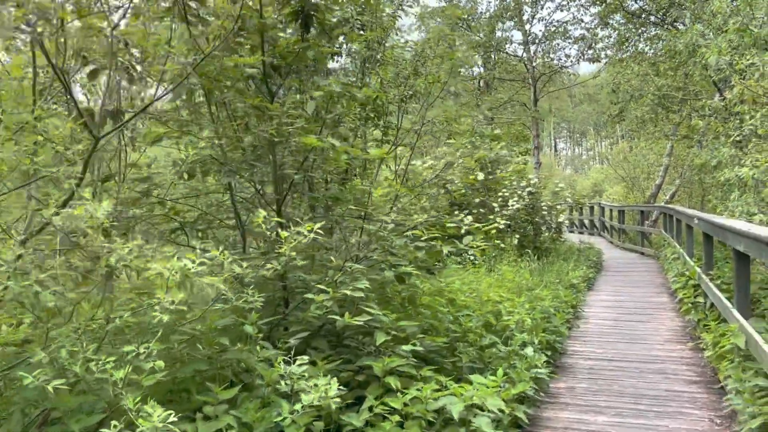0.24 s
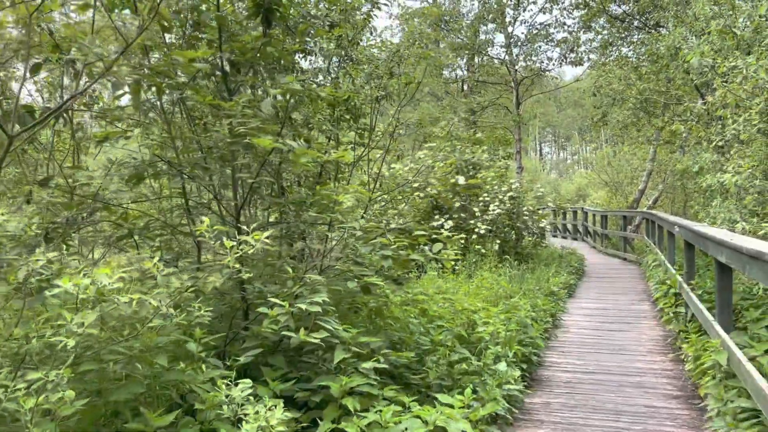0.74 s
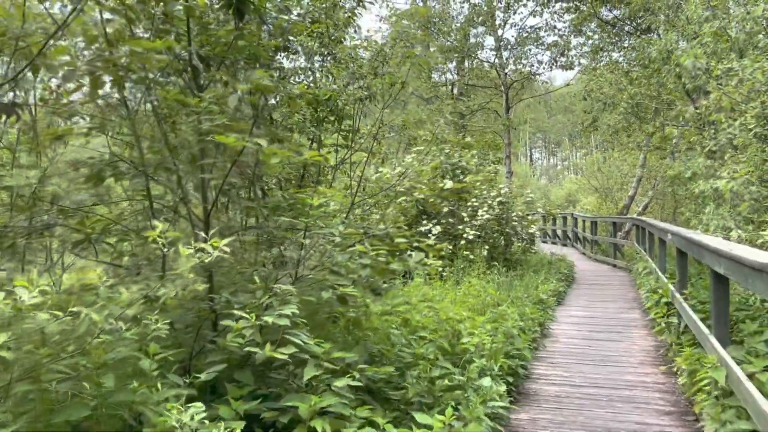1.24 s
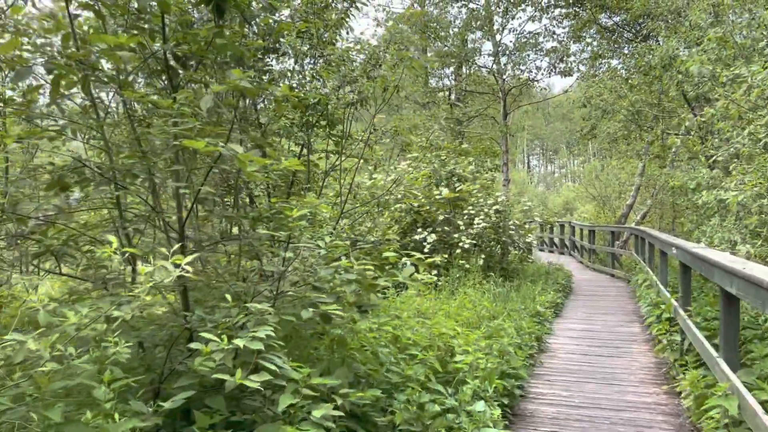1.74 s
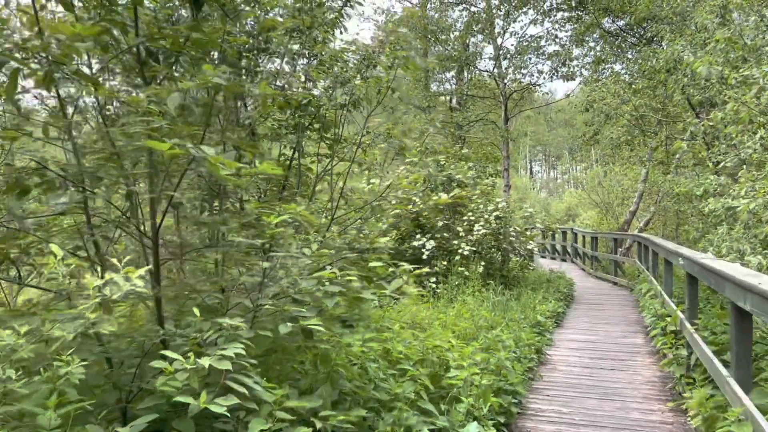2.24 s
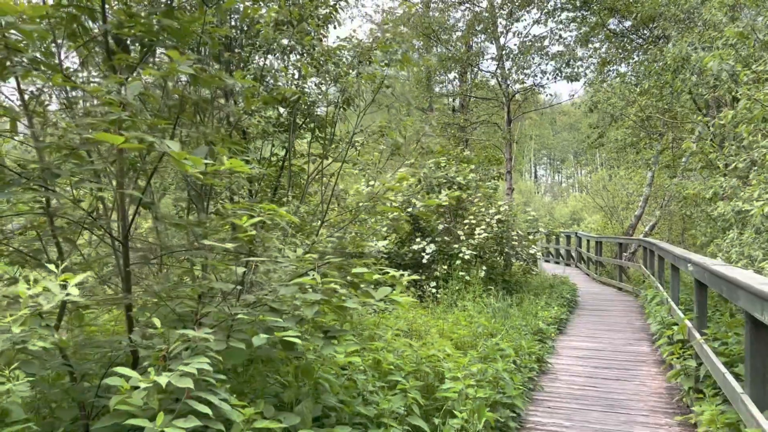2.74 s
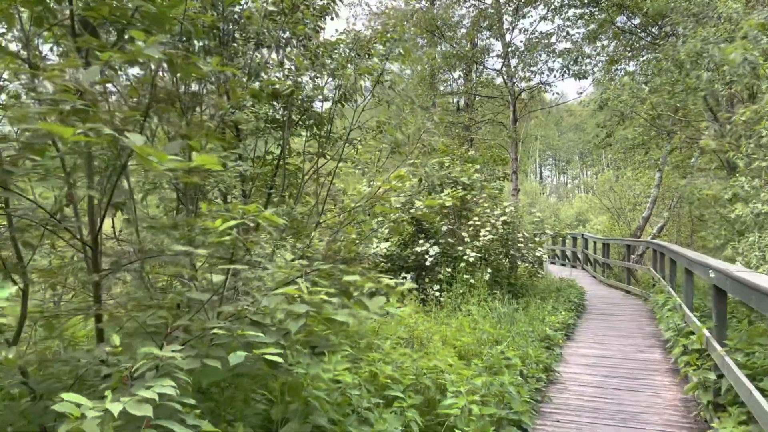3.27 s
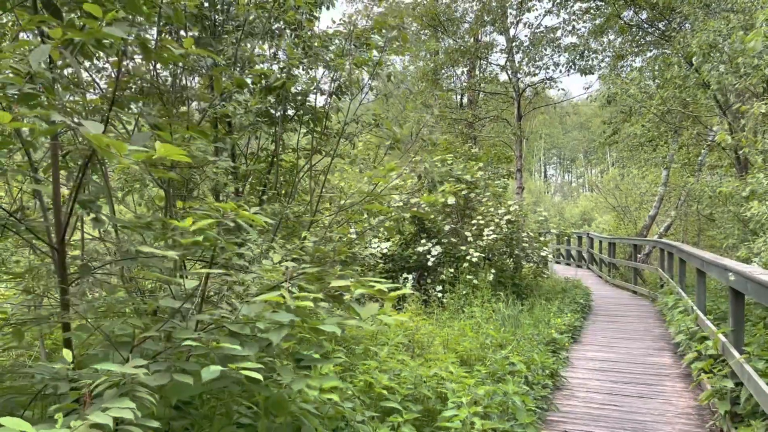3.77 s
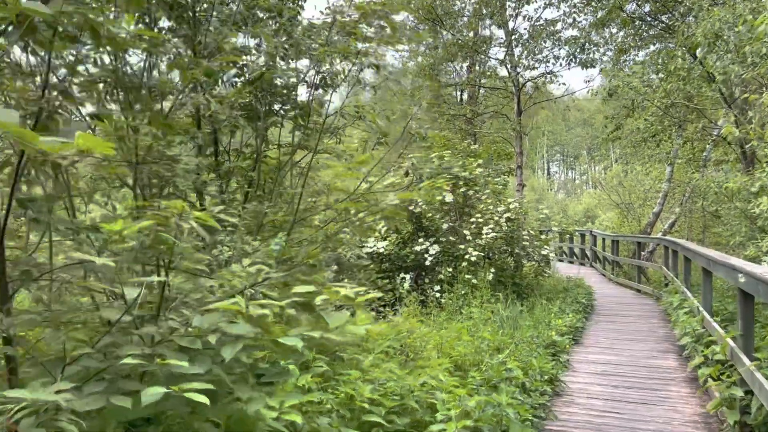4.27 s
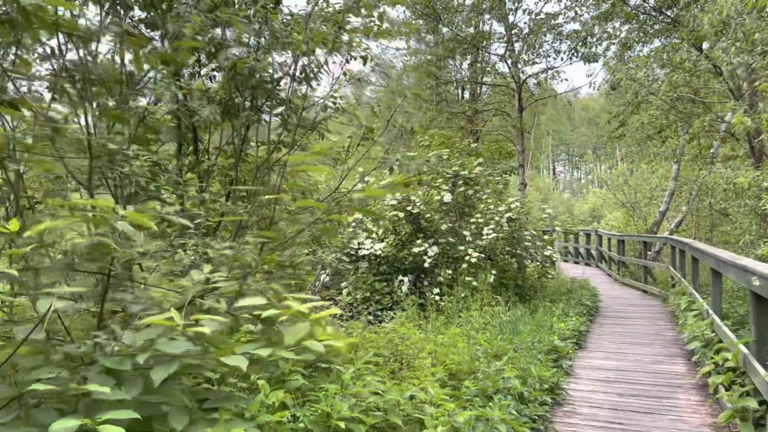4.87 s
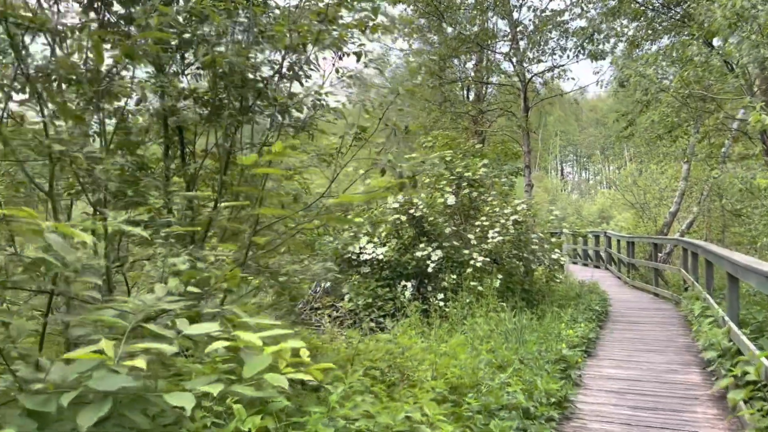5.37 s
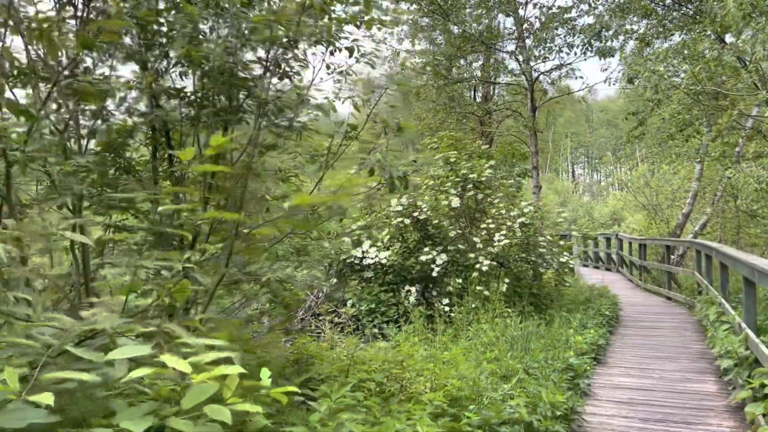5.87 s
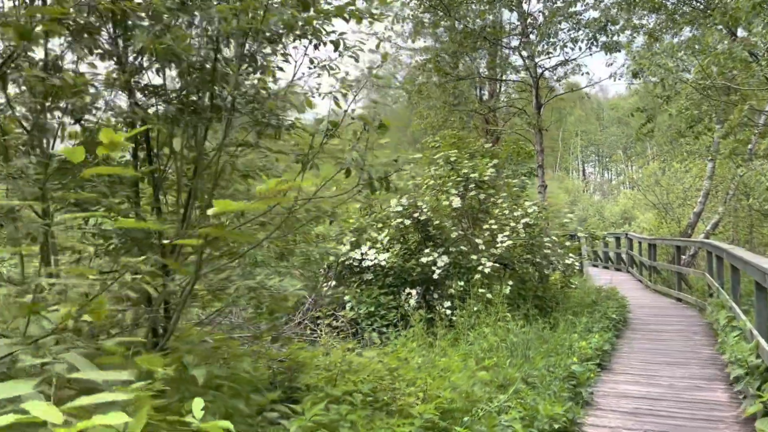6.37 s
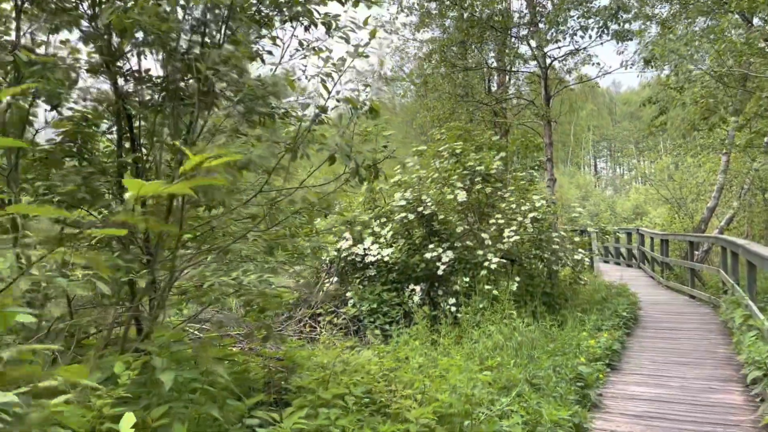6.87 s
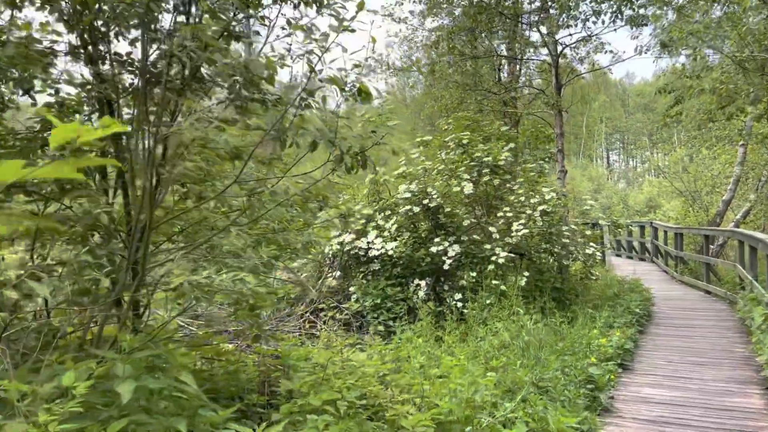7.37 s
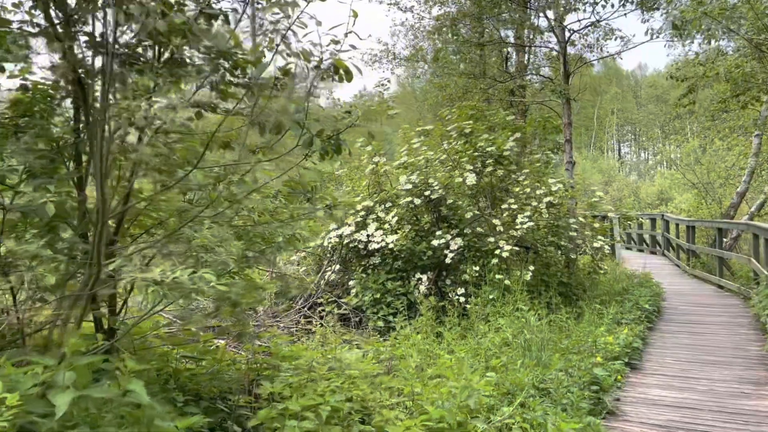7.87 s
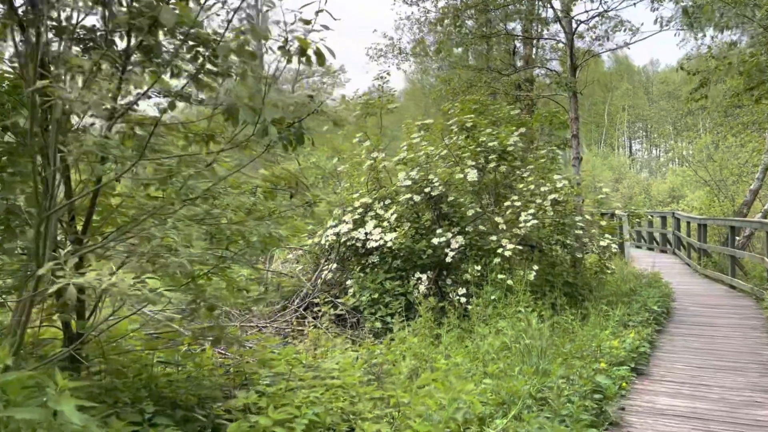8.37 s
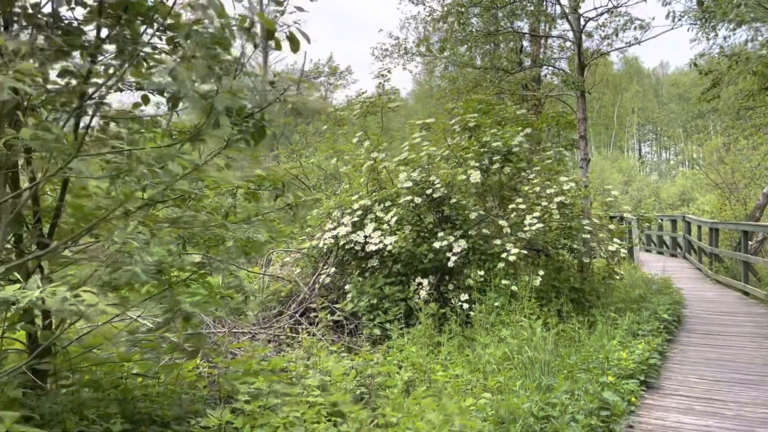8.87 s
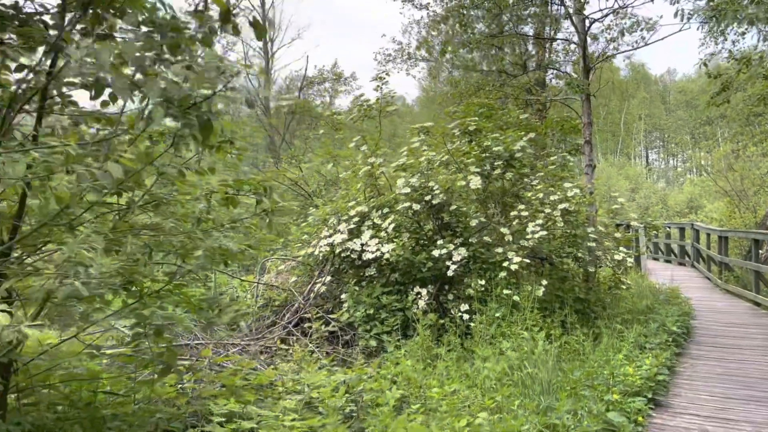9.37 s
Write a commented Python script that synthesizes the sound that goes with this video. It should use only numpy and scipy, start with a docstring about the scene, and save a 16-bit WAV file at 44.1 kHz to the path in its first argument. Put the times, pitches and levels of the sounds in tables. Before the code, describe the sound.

Several songbirds sing in a leafy wet wood, with quick gliding whistles near and a blurred chorus farther off. Song thins around the middle, then returns brighter and strongest near seven to eight and a half seconds. A low far traffic rumble swells gently beneath. Dull footfalls and hollow wooden knocks come now and then, with a loud cluster of knocks near the end. Hand-held phone stereo, outdoors.

```python
"""Whistled bird songs come first, near and far in a wet wood where trunks scatter each note into a short tail.
Each note is a gliding near-sine; random noise tails make the echoes, and a far chorus fills in behind.
Dull knocks and footfall thuds on a boardwalk are damped resonances; small ticks are short noise bursts.
Under it all lies a far traffic rumble made of noise bands. A hand-held phone colours the result."""
import sys
import numpy as np
from scipy import signal
from scipy.fft import rfft, irfft
from scipy.io import wavfile
from scipy.ndimage import uniform_filter1d

SR = 44100
rng = np.random.default_rng(int(sys.argv[2]) if len(sys.argv) > 2 else 0)


def to_wav(s):
    """Save 16-bit WAV."""
    ch = np.atleast_2d(s).T  # columns
    pcm = np.round(np.clip(ch, -1, 1) * 32767)  # PCM
    wavfile.write(sys.argv[1], SR, pcm.astype(np.int16))


N = 423801  # length in samples
FLUTTER_DB = 1.8  # moving leaves shake the direct sound of the birds


def undb(db):
    """Turn dB into a plain multiplier."""
    return 10 ** (np.asarray(db) / 20)


def lookup(x, table):
    """Read a two-column table at x, with straight lines between its rows."""
    return np.interp(x, *np.transpose(table))


def curve(seconds, values):
    """Stretch values given at some times into one value a sample."""
    return np.interp(np.arange(N) / SR, seconds, values)


def walk(rate_hz):
    """Slow random drift: random levels, held for one step and smoothed twice; spread near 1."""
    hold = int(SR / rate_hz)
    steps = np.repeat(rng.standard_normal(N // hold + 1), hold)
    return 1.39 * uniform_filter1d(uniform_filter1d(steps, hold), hold)[:N]


def add(out, s, sound):
    """Mix a sound into all channels of out, starting at s seconds."""
    i = max(int(s * SR), 0)
    out[:, i:i + sound.shape[1]] += sound[:, :N - i]


def whistle(length_s, pitch_hz, early_db, late_db, pan_db, edge_s, warble_hz=0., strokes_hz=1.):
    """A gliding near-sine with soft ends and a faint octave; a warble adds repeated falling strokes."""
    t = np.arange(int((length_s + edge_s) * SR)) / SR
    glide_hz = np.interp(t, np.linspace(0, length_s, len(pitch_hz)), pitch_hz)
    stroke = t * strokes_hz % 1  # runs from 0 to 1 in each stroke
    hz = uniform_filter1d(glide_hz, size=120) + warble_hz * (1 - 2 * stroke)
    phase = 2 * np.pi * np.cumsum(hz) / SR
    envelope = np.sin(np.pi / 2 * np.clip(np.minimum(t, t[-1] - t) / edge_s, 0, 1)) ** 2
    if warble_hz > 20:
        envelope *= np.sin(np.pi * stroke)  # each stroke swells and fades
    gain = undb(np.interp(t / length_s, [.25, .75], [early_db, late_db]))
    # the octave's strength depends on the pitch of the note
    octave_db = np.interp(hz, [3160, 4760, 5000, 5350, 7000], [-48, -28.5, -52.0, -22.5, -33.0])
    tone = np.sqrt(2) * (np.sin(phase) + undb(octave_db) * np.sin(2 * phase))
    left_right = undb(np.array([[pan_db], [-pan_db]]) / 2)
    return tone * envelope * gain * left_right


def wood(dry, t60_s):
    """Echoes from many trunks: a lumpy noise tail that builds up quickly, partly unlike left and right."""
    t = np.arange(int(1.2 * t60_s * SR)) / SR
    same, left, right = rng.standard_normal((3, len(t)))
    noise = 1.01 * same + np.array([left, right])
    lumps_db = 2.5 * walk(150)[:len(t)]
    decay_db = -60 * t / t60_s
    tail = noise * undb(lumps_db + decay_db) * (1 - np.exp(-t / 0.0026))
    tail /= np.sqrt(np.sum(tail ** 2) / 2)
    return signal.fftconvolve(dry, tail, axes=1)[:, :N]


# The whistled notes that stand out, each with a quick opening glide and a slower one after it.
# Each row: start in seconds, length in seconds, start pitch in Hz, turn pitch in Hz, end pitch in Hz,
# level in dB before leaves and echoes, left minus right in dB.
WHISTLED_NOTES = [(.002, 0.012, 3200, 3230, 3330, -53.5, 3), (0.033, 0.033, 2910, 3120, 2730, -54.5, -1),
                  (0.068, 0.04, 3220, 3430, 3850, -64, 3), (.437, .035, 2830, 2860, 2840, -62, 0),
                  (.484, 0.028, 3270, 3400, 3750, -70, 2), (0.714, 0.026, 2480, 3030, 4150, -60.5, 5),
                  (0.258, 0.035, 3450, 3700, 4110, -59.5, 5), (.398, 0.039, 4150, 3450, 3300, -63, 5),
                  (0.448, 0.031, 3760, 3400, 3280, -56, 0), (0.48, 0.037, 2770, 2043, 2000, -60.5, -9),
                  (0.516, 0.035, 3780, 3740, 3570, -56.5, 3), (0.65, 0.064, 3170, 3280, 2870, -56, -1),
                  (0.652, 0.02, 5920, 5260, 3500, -64, 9), (0.72, 0.027, 3520, 3060, 2340, -55.5, 7),
                  (0.894, 0.082, 3790, 3510, 3190, -54.5, 1), (1.09, 0.087, 2600, 2586, 2630, -62.5, -2),
                  (1.135, 0.064, 3660, 3630, 3600, -63.5, 6), (1.145, 0.058, 3056, 3003, 2854, -55.5, 0),
                  (1.313, 0.14, 4220, 4185, 4200, -62.5, 5), (1.375, 0.027, 2500, 2470, 2400, -60.5, -3),
                  (1.403, 0.066, 3260, 3336, 3180, -54.5, -1), (1.591, 0.033, 4100, 4180, 4210, -62, 9),
                  (1.408, 0.061, 2980, 2990, 3020, -58.5, 3), (1.851, 0.047, 3910, 3900, 3780, -64, 14),
                  (1.884, 0.18, 4900, 4940, 4670, -69.5, 6), (1.929, 0.07, 3720, 3560, 3240, -55, -1),
                  (2.093, 0.09, 3270, 3026, 3500, -54.5, -1), (2.217, 0.094, 4910, 4640, 4700, -67, 6),
                  (2.297, 0.065, 3400, 2820, 2834, -55, 1), (2.482, 0.18, 2350, 2330, 2400, -70, -1),
                  (2.297, 0.18, 3520, 3410, 3280, -65.5, 9), (2.402, 0.083, 3030, 2710, 2315, -60.5, -3),
                  (2.485, 0.054, 3264, 3400, 3140, -66, 16), (2.516, 0.042, 4740, 4470, 4380, -70, 1),
                  (2.563, 0.14, 3280, 3456, 3360, -68, 9), (2.663, 0.051, 2380, 2700, 3020, -64, 7),
                  (2.787, 0.032, 2660, 2820, 3000, -65, 7), (2.918, 0.049, 3380, 3410, 3650, -68, 9),
                  (2.995, 0.048, 3220, 3280, 3250, -69, 5), (2.818, 0.12, 2770, 2465, 2400, -65, 1),
                  (3.151, 0.06, 4800, 4740, 4700, -73, 4), (3.37, .075, 4600, 4450, 4100, -69.5, 8),
                  (3.508, 0.051, 3950, 3840, 3840, -68.5, 8), (3.744, .1, 2050, 2380, 2600, -59, 4),
                  (3.952, 0.034, 2690, 2885, 3140, -56, 9), (4.016, 0.023, 4580, 3700, 2710, -54.5, 4),
                  (4.038, 0.036, 2770, 2590, 2494, -57.5, 3), (4.677, 0.17, 1950, 1960, 1970, -72, -6),
                  (4.904, 0.24, 1966, 2006, 2072, -66, -5), (4.162, 0.03, 2470, 2090, 2260, -61.5, 3),
                  (4.179, 0.077, 4240, 4310, 4194, -54, 1), (4.252, 0.012, 4200, 3730, 2830, -58.5, 6),
                  (4.37, 0.1, 1960, 2270, 2325, -62, 1), (5.173, 0.022, 2070, 3070, 2860, -61, 4),
                  (4.522, 0.13, 2270, 2050, 1941, -64.5, 3), (4.908, 0.033, 5900, 6020, 6100, -62.5, 5),
                  (4.936, 0.02, 4930, 4450, 4230, -46.5, 2), (5.043, 0.022, 3420, 3850, 3940, -54, 4),
                  (5.404, 0.017, 4380, 4800, 5670, -60, 4), (5.405, 0.019, 3180, 3530, 4800, -57, 3),
                  (5.42, 0.015, 4610, 4760, 3410, -49.5, 4), (5.434, 0.12, 3330, 3420, 4260, -56.5, 3.5),
                  (5.448, 0.11, 3700, 4330, 5280, -59.5, 2), (5.453, 0.14, 1990, 2265, 2720, -68.5, 7),
                  (5.558, 0.022, 5300, 5270, 5170, -63, 7), (5.629, 0.098, 6520, 6380, 6300, -58.5, 4),
                  (5.63, 0.15, 8080, 8380, 8480, -55, 1), (5.746, 0.094, 2506, 2485, 2280, -61.5, 1),
                  (5.825, 0.025, 6030, 5060, 5340, -51.5, 4), (5.84, 0.026, 4000, 3916, 3940, -47, 0.5),
                  (6.015, 0.026, 4790, 4600, 2780, -57, 2), (6.03, 0.022, 9000, 7000, 3530, -58.5, 5),
                  (6.046, 0.028, 9550, 9000, 7500, -63.5, -2), (6.075, 0.039, 6860, 6950, 7000, -56.5, 6),
                  (6.188, 0.0097, 2440, 2210, 2070, -56.5, 5), (6.206, 0.027, 2520, 2550, 2510, -57, 8),
                  (6.226, .015, 2030, 2100, 2240, -56, 4), (6.302, 0.081, 5230, 5180, 4820, -47.5, 3),
                  (6.407, 0.036, 2150, 1995, 2100, -58, -1), (6.498, 0.058, 2690, 2480, 2690, -51, 7),
                  (6.546, 0.032, 2590, 2860, 3376, -49.5, 7.5), (6.605, .02, 4500, 4650, 4950, -61, 3),
                  (6.664, 0.096, 6650, 7150, 6960, -54, 11.5), (6.853, 0.018, 4070, 4030, 3890, -49.5, 2),
                  (6.863, 0.009, 3900, 3500, 2850, -51, 10), (6.871, 0.1, 3060, 3230, 2923, -44.5, 7.5),
                  (7.04, .053, 2683, 2816, 3500, -44, 7), (7.185, 0.05, 3820, 4675, 4585, -50, 3),
                  (7.234, 0.043, 3245, 2750, 2486, -49.5, 8), (7.394, 0.069, 4490, 3890, 3975, -41, 1.5),
                  (7.526, 0.14, 2415, 2552, 2597, -57.5, 4.5), (7.541, 0.024, 5000, 5300, 5830, -52, 5),
                  (7.557, 0.0088, 5850, 5470, 4840, -50, 4), (7.577, 0.048, 5940, 5650, 5544, -44.5, 6.5),
                  (7.626, 0.076, 3930, 3240, 2815, -45.5, 6), (7.875, 0.03, 2410, 2620, 2450, -58, 8),
                  (7.915, 0.022, 2920, 2970, 2890, -54, 6), (7.91, 0.044, 2290, 2580, 2160, -53, 7.5),
                  (7.928, 0.11, 3900, 3940, 3680, -63.5, 8), (8.027, 0.04, 2490, 2880, 3120, -48.5, 9),
                  (8.07, 0.055, 3070, 3097, 2820, -45, 6), (8.165, 0.028, 2520, 2530, 2490, -59.5, 2),
                  (8.318, 0.043, 2540, 2470, 2520, -62.5, 1), (8.274, 0.019, 3750, 3630, 3390, -60, 8),
                  (8.335, 0.017, 3530, 3440, 3220, -59, 4), (8.2, 0.021, 2050, 1990, 1900, -68, 0),
                  (8.044, 0.056, 2474, 2555, 2470, -55.5, 1), (8.161, .012, 3720, 4220, 5230, -51, 4),
                  (8.174, 0.012, 5250, 4870, 4400, -48.5, 5), (8.182, 0.031, 4330, 4295, 3840, -38.5, 5),
                  (8.214, 0.042, 3850, 3346, 3156, -40.5, 5.5), (8.373, 0.058, 3505, 3198, 3205, -39, 6.5),
                  (8.431, 0.033, 3240, 3040, 2895, -47.5, 8), (8.507, 0.039, 3240, 2905, 2530, -57.5, 7),
                  (8.345, 0.036, 8960, 7000, 3390, -57, 5), (8.477, 0.0092, 3880, 4520, 4590, -51.5, 2),
                  (8.492, 0.015, 3360, 3700, 3580, -57, 6), (8.537, 0.025, 5910, 6126, 5500, -43, 3),
                  (8.556, 0.047, 5330, 5600, 5600, -40, 6.5), (8.644, 0.044, 3760, 3737, 3360, -43.5, 8),
                  (8.735, 0.016, 3340, 3330, 3360, -42.5, 4), (8.777, 0.022, 4030, 4650, 3820, -62, -3),
                  (8.838, 0.088, 2920, 2287, 2170, -53.5, 2), (9.193, 0.013, 2640, 2460, 2200, -63, 3),
                  (9.256, .014, 2140, 2110, 1900, -60.5, -2), (8.927, 0.066, 2174, 2966, 2740, -50.5, 7.5)]
# Faint voices are unsteady. Each row: note level in dB, pitch scatter as a share of the pitch.
PITCH_WAVER = [(-72, .018), (-62, .003)]
# Strong notes grow, faint ones fade. Each row: note level in dB, growth in dB over the middle half.
NOTE_SWELL = [(-73, -2), (-55, 0), (-26, 3)]
# Rattles of quick falling strokes. Each row: start in seconds, length in seconds, start pitch in Hz,
# end pitch in Hz, strokes a second, level in dB before leaves and echoes.
RATTLE_CALLS = [(0.212, 0.02, 4290, 3740, 90, -57.5), (6.765, 0.049, 4960, 3710, 164, -47),
                (8.687, 0.034, 3455, 3150, 84, -47.5), (8.748, 0.084, 4030, 4130, 62, -59.5),
                (9.06, 0.052, 4670, 3410, 77, -64), (9.1, 0.105, 2886, 2446, 68, -59),
                (9.372, 0.026, 3130, 2186, 104, -56), (6.189, 0.066, 2380, 2180, 106, -69)]
TURN_SHARE = .36  # part of a note spent on the opening glide
GLIDE_EASE = 1.51  # above 1: the opening glide slows into the turn


def near_birds():
    """Notes that stand out; leaves close by blur each one and the wood adds its tail."""
    to_wood, direct, to_leaves = np.zeros((3, 2, N))
    along = np.linspace(0, 1, num=19)
    opening = np.clip(1 - along / TURN_SHARE, 0, 1) ** GLIDE_EASE
    closing = np.clip((along - TURN_SHARE) / (1 - TURN_SHARE), 0, 1)
    waver = rng.standard_normal((len(WHISTLED_NOTES), len(along)))
    for (s, length, start, turn, end, db, pan_db), chance in zip(WHISTLED_NOTES, waver):
        pitch = turn + (start - turn) * opening + (end - turn) * closing
        pitch *= 1 + chance * lookup(db, PITCH_WAVER)
        half_swell_db = lookup(db, NOTE_SWELL) / 2
        note = whistle(length, pitch, db - half_swell_db, db + half_swell_db, pan_db,
                       edge_s=0.0027 + 0.05 * length)
        # faint means far: less direct sound and more blur from leaves; short notes keep more of their direct
        # sound
        direct_db = np.interp(db, [-68, -52], [-13, -1.5]) * min(length / 0.061, 1)
        leaves_db = np.interp(db, [-58, -42], [0, -8])
        add(to_wood, s - .002, note)
        add(direct, s - .002, note * undb(direct_db))
        add(to_leaves, s - .002, note * undb(leaves_db))
    for s, length, start, end, rate_hz, db in RATTLE_CALLS:
        note = whistle(length, [start, end], db, db, 5.6, edge_s=0.0023, warble_hz=606, strokes_hz=rate_hz)
        for part in (to_wood, direct, to_leaves):
            add(part, s, note)
    shaken = direct * undb(FLUTTER_DB * walk(70))
    blur = undb(-5.5) * wood(to_leaves, t60_s=0.073)
    return shaken + blur + undb(-7.5) * wood(to_wood, t60_s=0.54)


# In the bird tables below, levels are before the direct sound and echoes are balanced.
# Steep sweeps whose pitch settles fast. Each row: start in seconds, length in seconds,
# pitch in Hz that the glide comes from (it begins partway in), end pitch in Hz, level in dB.
SWEEP_CALLS = [(0.368, .028, 3540, 4420, -70), (.58, 0.0183, 3100, 4320, -68),
               (6.011, 0.0092, 3620, 7600, -61), (6.073, 0.011, 4020, 7140, -60.5),
               (8.614, 0.0077, 3610, 5050, -65)]
# One bird's high buzzy call, repeated. Each row: start in seconds, length in seconds, level in dB.
BUZZ_CALLS = [(2.169, 0.076, -74), (2.726, 0.088, -71), (3.212, 0.097, -72), (3.608, 0.067, -68),
              (4.2, 0.089, -72.5), (5.594, 0.12, -68), (6.245, .12, -69), (6.938, 0.11, -66.5),
              (9.149, 0.089, -62)]
BUZZ_FROM_HZ, BUZZ_END_HZ, BUZZ_WARBLE_HZ = 7700, 6650, 403
# Other rough, warbled notes. Each row: start in seconds, length in seconds, pitch in Hz that the glide
# comes from (it begins partway in), end pitch in Hz, warble depth in Hz up and down, level in dB.
RASP_CALLS = [(.815, 0.15, 5760, 5250, 230, -69), (1.04, 0.12, 5600, 5500, 360, -73),
              (1.271, 0.079, 6500, 6380, 130, -74.5), (1.737, 0.07, 6000, 5850, 200, -76),
              (1.715, 0.14, 5500, 4700, 80, -71), (1.57, 0.031, 6030, 5800, 150, -75.5),
              (2.95, 0.13, 3300, 3670, 260, -74), (9.21, 0.122, 3480, 3400, 250, -69.5),
              (4.1, 0.186, 4800, 3400, 280, -80.5), (2.62, 0.077, 2900, 2500, 150, -73.5),
              (4.926, 0.11, 8400, 7440, 880, -64), (4.993, 0.0298, 8440, 6700, 220, -60.5),
              (5.296, 0.056, 6950, 8800, 530, -61), (5.34, 0.031, 7870, 8040, 198, -58.5),
              (6.028, 0.038, 11700, 10900, 440, -69), (8.56, 0.027, 9500, 8400, 900, -72)]
# Thin falling "tsip" calls, alike in start pitch and length.
# Each row: start in seconds, end pitch in Hz, level in dB.
TSIP_CALLS = [(.1, 3900, -81), (7.328, 4920, -71), (8.466, 5000, -65), (1.925, 4160, -71),
              (2.295, 4800, -78), (2.857, 5100, -77), (2.986, 5170, -73.5), (3.143, 4620, -78),
              (3.361, 4410, -77), (3.495, 3880, -89), (3.703, 3770, -73), (4.07, 5170, -73.5),
              (4.444, 4340, -70.5), (4.795, 3840, -70), (5.161, 5140, -71), (5.238, 4500, -69.5),
              (6.218, 5070, -75), (6.755, 5200, -58.5), (8.855, 4370, -69), (9.252, 3550, -73)]
TSIP_S, TSIP_START_HZ = 0.013, 6720


def deep_wood_birds():
    """Sweeps, buzzes, rasps and tsips from deeper in the wood: more tail than direct sound."""
    out = np.zeros((2, N))
    calls = [(s, length, start, end, 0, db) for s, length, start, end, db in SWEEP_CALLS]
    calls += [(s, length, BUZZ_FROM_HZ, BUZZ_END_HZ, BUZZ_WARBLE_HZ, db) for s, length, db in BUZZ_CALLS]
    calls += list(RASP_CALLS)
    for s, length, start, end, warble, db in calls:
        pitch = end + (start - end) * np.array([0.82, 0.23, 0.19, 0.061, 0.0])
        # longer calls fade in and out more gently
        add(out, s, whistle(length, pitch, db, db, 4.3, edge_s=0.0014 + 0.024 * length,
                            warble_hz=warble, strokes_hz=185.7))
    for s, end, db in TSIP_CALLS:
        pitch = end + (TSIP_START_HZ - end) * np.array([1, .45, 0])
        add(out, s, whistle(TSIP_S, pitch, db, db, 2, edge_s=0.005))
    return undb(FLUTTER_DB * walk(90) - 0.5) * out + undb(3.0) * wood(out, t60_s=0.48)


# Low arched notes of one far bird. Each row: start in seconds, top pitch in Hz,
# place of the crest as a share of the length.
ARCHED_NOTES = [(1.572, 2130, .5), (1.685, 2100, .4), (1.767, 1950, .4), (1.928, 1770, .5), (2.0, 1875, .5),
                (2.148, 1830, 0.66), (2.238, 1860, 0.34), (2.355, 1790, 0.64), (2.408, 1850, .3),
                (2.515, 1840, .6), (2.608, 2110, .3), (2.676, 1960, 0.47), (2.76, 2110, 0.79),
                (2.85, 2070, 0.72), (2.935, 2000, .1), (3.016, 2050, 0.17), (3.122, 1910, .8),
                (3.2, 2150, 0.12), (3.412, 1960, 0.58), (3.525, 2220, 0.6), (3.57, 2120, 0.12),
                (4.0, 2060, .25), (4.088, 2060, 0.09)]
ARCH_S, ARCH_BEND, ARCH_DB = 0.037, 0.347, -75  # length, depth of the pitch bend, middle level
# Low falling clucks of one bird. Each row: start in seconds, level in dB.
CLUCK_CALLS = [(0.186, -66.5), (0.272, -65), (.412, -67), (0.494, -65), (0.63, -65), (0.716, -63)]
CLUCK_S, CLUCK_START_HZ, CLUCK_END_HZ = 0.0114, 2010, 1330


def low_far_birds():
    """A far bird repeats a low arch whose crest comes early or late, another clucks; distance blurs both."""
    out = np.zeros((2, N))
    along = np.linspace(0, 1, num=9)
    for (s, top_hz, crest), chance in zip(ARCHED_NOTES, rng.standard_normal(len(ARCHED_NOTES))):
        db = ARCH_DB + 1.5 * chance
        longer_side = .5 + abs(crest - .5)
        fall = (along - crest) ** 2 / (longer_side * 2 - .5)  # the line below works out this same bend again
        fall = (along - crest) ** 2 / (.5 + abs(crest - .5) * 2)
        add(out, s, whistle(ARCH_S, top_hz * (1 - ARCH_BEND * fall), db, db, -2.5, edge_s=0.0079))
    for s, db in CLUCK_CALLS:
        add(out, s, whistle(CLUCK_S, [CLUCK_START_HZ, CLUCK_END_HZ], db, db, 0, edge_s=.003))
    return out + undb(-4.5) * wood(out, t60_s=0.09)


# Loudness of the far chorus over time.
# Each row: time in seconds, level of the high voices in dB, level of the low voices in dB.
CHORUS_LEVELS = [(0.0, -63, -60.5), (2.19, -67.5, -79.5), (2.78, -74, -78), (3.51, -83, -92),
                 (4.07, -69, -78), (4.74, -95.5, -72), (6.37, -67.5, -71), (6.9, -69.5, -75.5),
                 (8.0, -68, -70), (8.24, -60.5, -72), (9.61, -72, -74.5)]
# Loudness of chorus notes by pitch. Each row: pitch in Hz, relative level in dB.
CHORUS_TONE = [(1700, -2.5), (2200, -6), (3200, 6.5), (4200, 0.5), (5200, -8.5)]


def far_birds(count=2500):
    """Very many short falling and rising notes at random, mostly echo; high and low voices swell apart."""
    s, *levels = np.transpose(CHORUS_LEVELS)
    voices = np.zeros((2, 2, N))  # high voices, then low voices, each in stereo
    lowest_hz, highest_hz = CHORUS_TONE[0][0], CHORUS_TONE[-1][0]
    for when, pitch, glide, length, size, side in rng.random((count, 6)):
        centre = lowest_hz * (highest_hz / lowest_hz) ** pitch
        note_db = lookup(centre, CHORUS_TONE) - 1.8 * np.log(size)
        bend = 0.513 * (1 - 0.734 * length) * (glide - .35)  # longer notes bend less
        glide_hz = centre * (1 + bend * np.array([1, 0, -.5]))
        note = whistle(0.00766 + 0.02505 * length ** 2, glide_hz, note_db, note_db, 8 * side - 3, edge_s=0.0012)
        add(voices[int(centre < 2600)], when * N / SR, note)
    out = 0
    for voice, level_db in zip(voices, levels):
        heard = undb(-2.5) * voice + wood(voice, t60_s=0.95)
        # even out the loudness over a third of a second, then follow the table
        power = uniform_filter1d(np.mean(heard ** 2, axis=0), size=SR // 3)
        out = out + heard / np.sqrt(power + 1e-9) * undb(curve(s, level_db))
    return out


def ring(hz, rise_s, count):
    """A soft blow into a well damped resonance: swells over a cycle or two and dies; peak 1."""
    t = np.arange(int(12 * count * rise_s * SR)) / SR
    y = t ** count * np.exp(-t / rise_s) * np.sin(2 * np.pi * hz * t)
    return y / np.abs(y).max()


# Knocks on the boardwalk. Each row: time in seconds, peak of the hollow knock in dB, peak of the thud in dB.
KNOCK_HITS = [(.484, -35, -56), (3.546, -52.5, -47), (4.404, -40.5, -54), (4.419, -49, -55),
              (4.595, -36, -51), (4.601, -38.5, -43.5), (5.527, -52.5, -42), (5.586, -42.5, -44),
              (5.918, -38.5, -53), (6.759, -65, -44.5), (7.326, -47, -40.5), (8.82, -44, -45),
              (9.288, -21.5, -62), (9.3079, -25.5, -50), (9.3301, -20.5, -44), (9.3522, -22, -47)]
# Footfalls on the planks. Each row: start in seconds, peak in dB midway between left and right.
FOOTFALLS = [(0.929, -42), (2.018, -38.5), (5.011, -43), (8.061, -46), (8.565, -46.5), (9.293, -42.5)]
BODY_LAG_S = 0.00047  # the low part travels through the hand and reaches the left port later


def knocks():
    """Damped resonances: a hollow knock with some body, a lower thud of the planks, and deep footfalls."""
    out = np.zeros((2, N))
    left, right = out[:1], out[1:]
    knock, body, thud = ring(564, 0.00095, count=3), ring(283, 0.0013, count=1), ring(200.0, 0.0032, count=1)
    for s, knock_db, thud_db in KNOCK_HITS:
        add(out, s - .0006, undb(knock_db) * knock[None])
        for port, lag_s in ((left, BODY_LAG_S), (right, 0)):
            add(port, s + 0.00013 + lag_s, undb(knock_db - 7.5) * body[None])
            add(port, s + lag_s, undb(thud_db) * thud[None])
    footfall = ring(98.0, 0.011, count=1) * np.array([[1.1], [.9]])  # a little stronger on the left
    for s, db in FOOTFALLS:
        add(out, s, undb(db) * footfall)
    return out


# Broad ticks. Each row: start in seconds, level in dB before the snap's fading shape,
# top of the noise band in Hz.
TICK_SNAPS = [(0.923, -70, 12100), (1.008, -71.5, 11900), (2.002, -71, 8950), (3.24, -71, 1610),
              (3.305, -68, 2600), (3.936, -65, 2500), (4.591, -69.5, 13000), (5.791, -65.5, 1510),
              (5.875, -64, 1510), (7.953, -64, 2030), (8.014, -73, 12600), (9.444, -67, 2950)]


def ticks():
    """Dry snaps of noise with a short tail, as from twigs and drops."""
    out = np.zeros((2, N))
    t = np.arange(SR // 30) / SR
    fade = 2.6 * np.exp(-t / 0.0035) + .55 * np.exp(-t / .022)  # sharp snap, then a weaker tail
    for s, db, top_hz in TICK_SNAPS:
        band = signal.butter(2, [800, top_hz], "band", fs=SR, output="sos")
        burst = signal.sosfilt(band, rng.standard_normal((2, len(t))))
        add(out, s, undb(db) * burst / burst.std() * fade)
    return out


# Tone of the steady air. Each row: pitch in Hz, relative level in dB per Hz.
AIR_TONE = [(15, -41), (25, 5.5), (71, 2.5), (163, -13), (476, -24.5), (651, -20.5), (914, -38),
            (1220, -41.5), (1900, -43), (3550, -40), (6990, -53), (8840, -53), (10100, -67.5), (11500, -45),
            (12700, -93.5), (16500, -107), (22000, -120)]
# Swell of the rumble; only the change around each column's average is used.
# Each row: time in seconds, deep rumble in dB, upper rumble in dB.
RUMBLE_SWELL = [(0.0, -59.5, -70), (1.15, -57.5, -66.5), (1.63, -61, -68.5), (3.53, -55, -68.5),
                (4.55, -55.5, -65.5), (5.17, -55.5, -66), (6.579, -57.5, -62.5), (6.77, -54, -65),
                (8.4, -58.5, -66), (8.96, -54.5, -68.5), (9.61, -57, -64)]
AIR_DB = -48  # overall rms level before the phone


def air():
    """Half-octave noise bands of far traffic and leaves flicker alone; the bass swells, alike at both ports."""
    hz = np.arange(N // 2 + 1) * SR / N + 1
    log_hz = np.log(hz)
    tone_hz, tone_db = np.transpose(AIR_TONE)
    mid, side = rfft(rng.standard_normal((2, N))) * undb(np.interp(log_hz, np.log(tone_hz), tone_db))
    # little left-right difference in the bass, more higher up
    side = side * np.interp(log_hz, np.log([40, 150, 500, 750, 1200]), [0.071, 0.3, 0.31, 0.33, 0.82])
    lean = undb(np.interp(log_hz, np.log([100, 400]), [1.2, .1]))  # the bass leans left
    both = np.array([(mid + side) * lean, (mid - side) / lean])
    s, deep_db, upper_db = np.transpose(RUMBLE_SWELL)
    deep_swell = curve(s, deep_db - np.mean(deep_db))
    upper_swell = curve(s, upper_db - np.mean(upper_db))
    out = 0
    for octave in np.arange(4, 14.5, .5):  # band centre is 2 ** octave Hz
        band = np.clip(1 - 2 * np.abs(np.log2(hz) - octave), 0, 1)
        # the upper swell weakens with pitch until it is gone
        swell_db = deep_swell if octave < 7.2 else upper_swell * np.clip((9.6 - octave) / 1.14, 0, 1)
        out = out + irfft(both * band, N) * undb(swell_db + 2.2 * walk(9))
    return out * undb(AIR_DB) / np.sqrt(np.mean(out ** 2))


def scene():
    """Birds, knocks, ticks and the steady air together."""
    birds = near_birds() + deep_wood_birds() + low_far_birds() + far_birds()
    return birds + knocks() + ticks() + air()


# Phase difference of the phone's two ports. Each row: pitch in Hz, lead of the left port in radians.
PORT_PHASE = [(100, -0.17), (380, -0.098), (520, -0.93), (780, -1.1), (1300, -1.13), (2070, -0.38),
              (2930, 1.5), (3960, -0.24), (5600, 1.2), (8870, -0.32)]


def record(dry):
    """The two ports differ in phase and the left one is duller; the phone cuts the deep bass and the top."""
    hz = np.arange(N // 2 + 1) * SR / N
    lead = np.exp(1j * lookup(hz, PORT_PHASE))
    dull = undb(np.interp(hz, [6000, 11000], [0, -3.5]))
    left = irfft(rfft(dry[0]) * lead * dull, N)
    bass_cut = signal.cheby1(3, 3.0, 50, "high", fs=SR, output="sos")
    top_cut = signal.ellip(8, .2, 70, 12600, fs=SR, output="sos")
    return signal.sosfilt(top_cut, signal.sosfilt(bass_cut, [left, dry[1]]))


dry = scene()
out = record(dry)
to_wav(out)
```